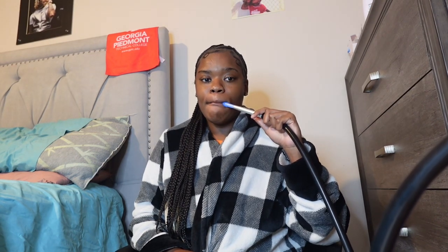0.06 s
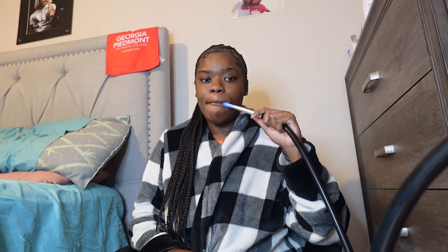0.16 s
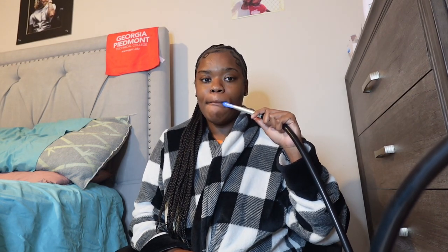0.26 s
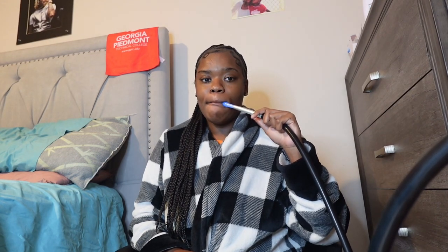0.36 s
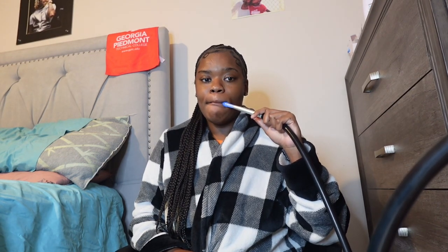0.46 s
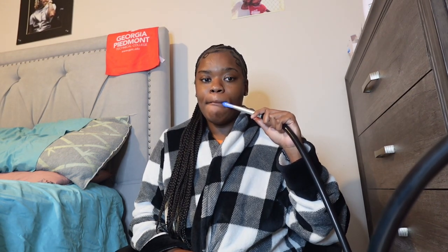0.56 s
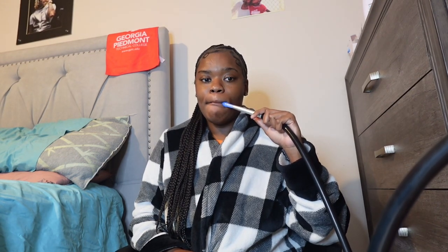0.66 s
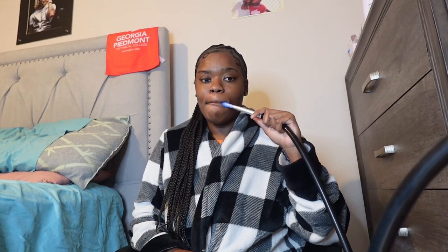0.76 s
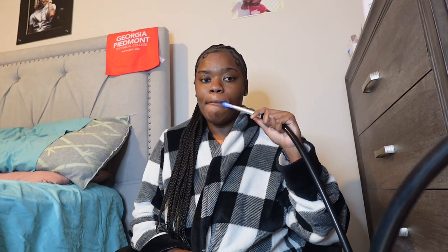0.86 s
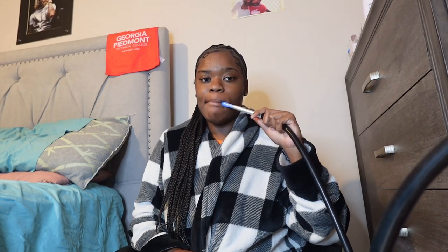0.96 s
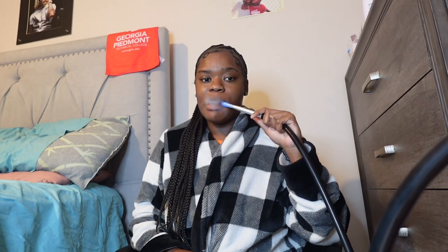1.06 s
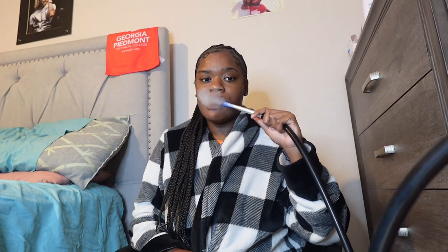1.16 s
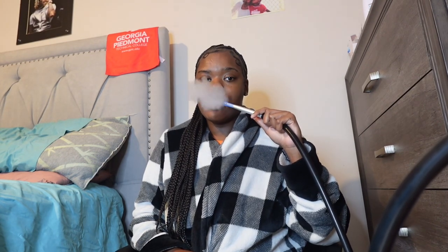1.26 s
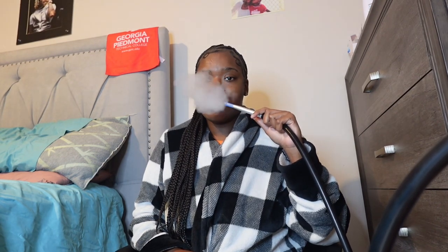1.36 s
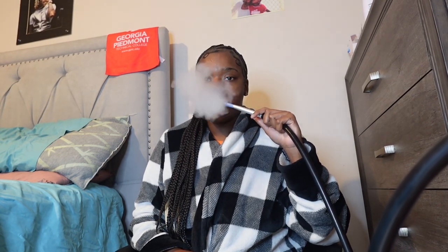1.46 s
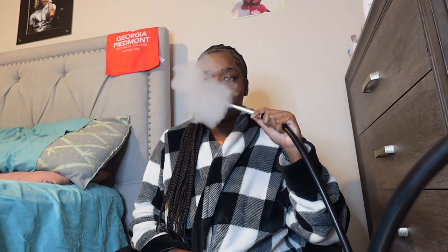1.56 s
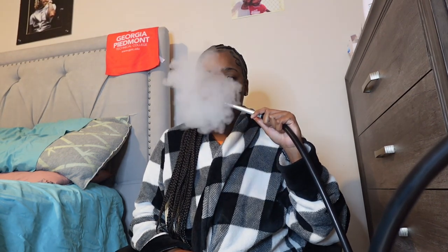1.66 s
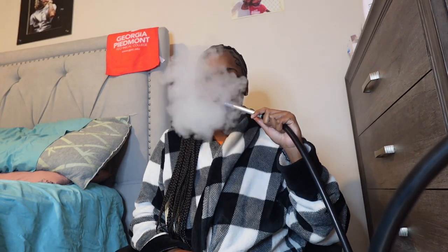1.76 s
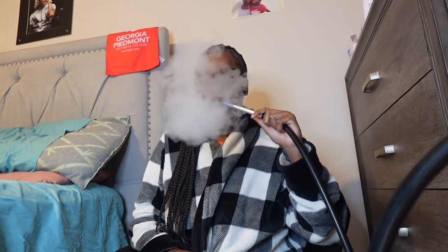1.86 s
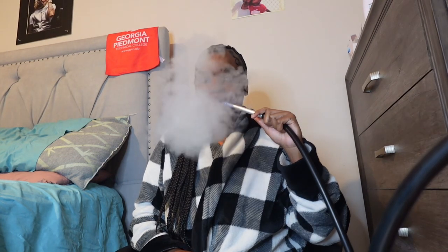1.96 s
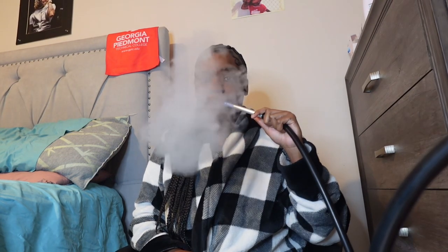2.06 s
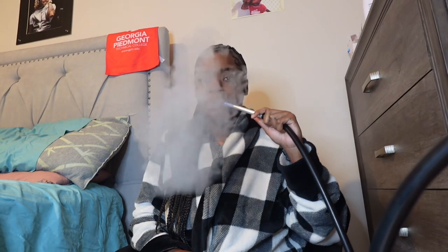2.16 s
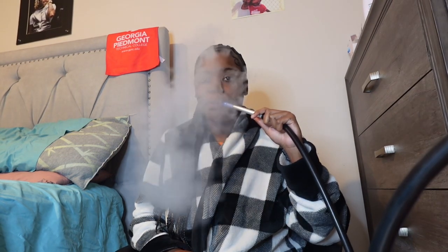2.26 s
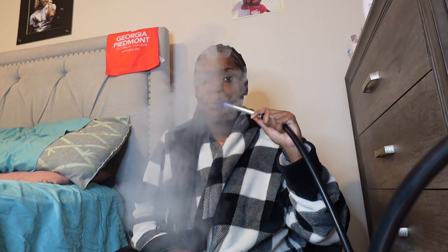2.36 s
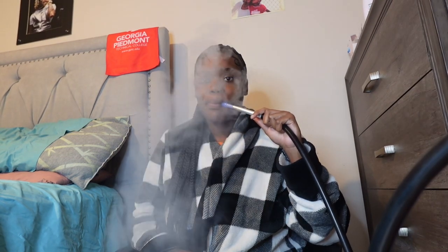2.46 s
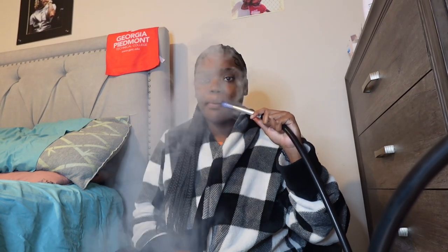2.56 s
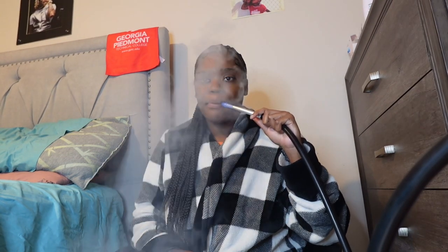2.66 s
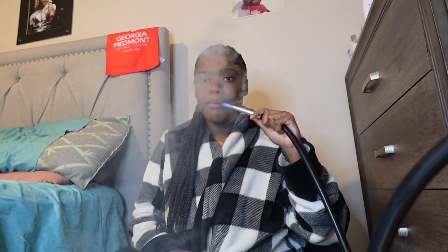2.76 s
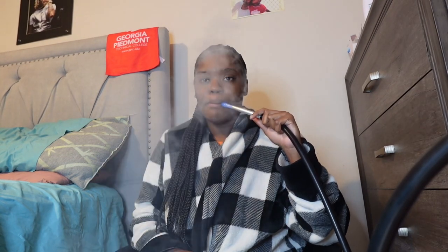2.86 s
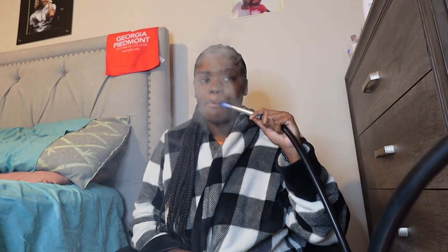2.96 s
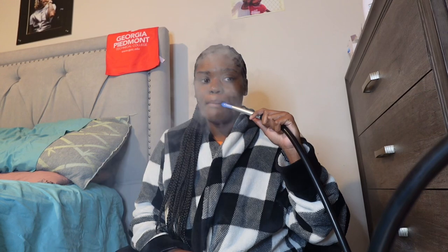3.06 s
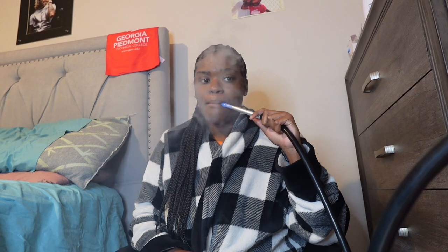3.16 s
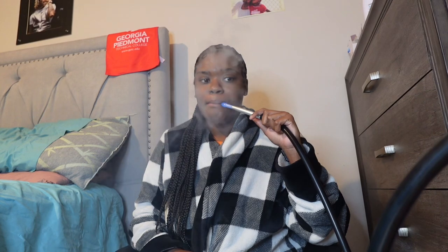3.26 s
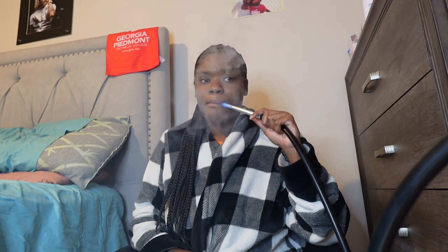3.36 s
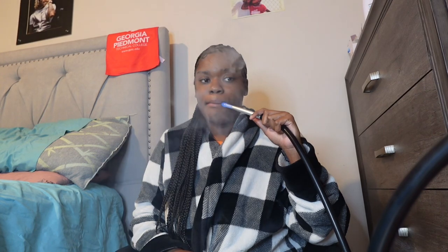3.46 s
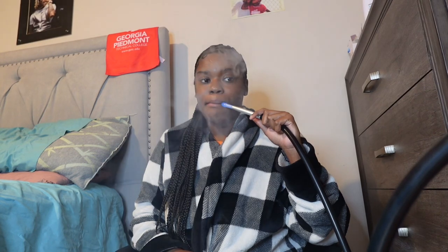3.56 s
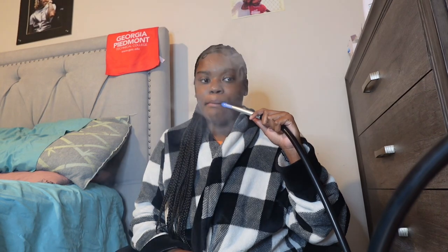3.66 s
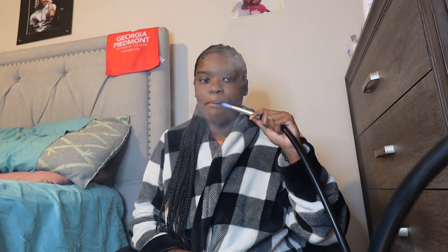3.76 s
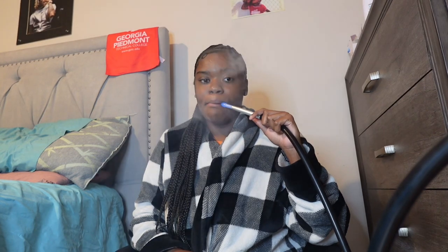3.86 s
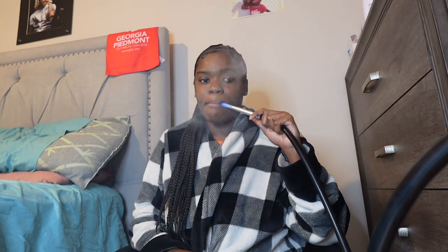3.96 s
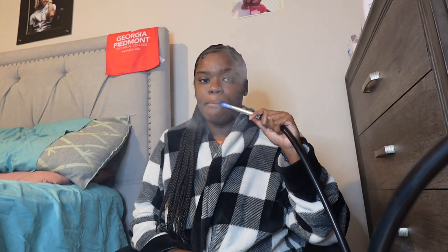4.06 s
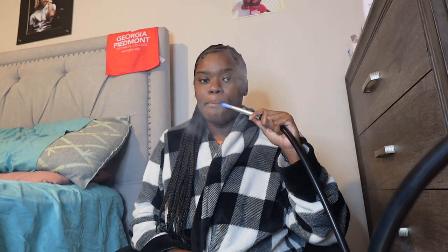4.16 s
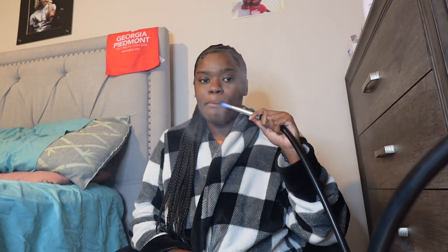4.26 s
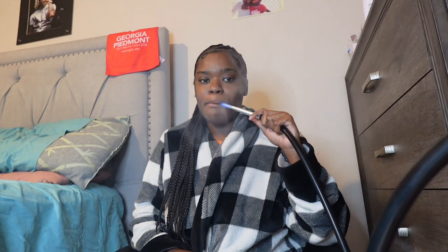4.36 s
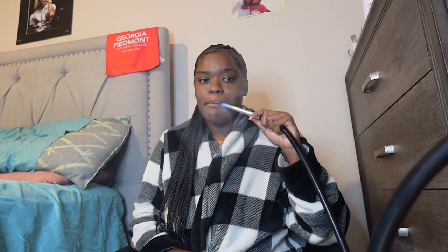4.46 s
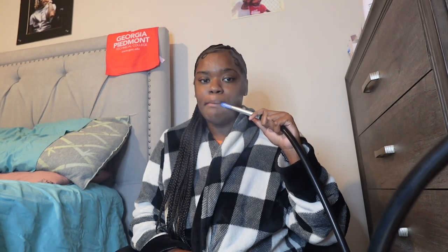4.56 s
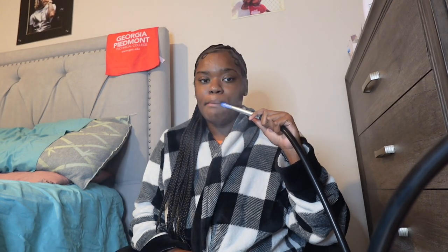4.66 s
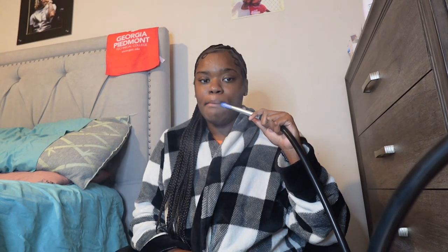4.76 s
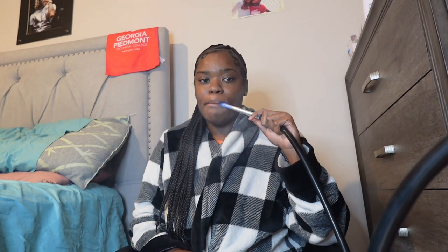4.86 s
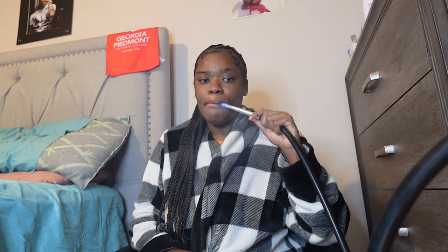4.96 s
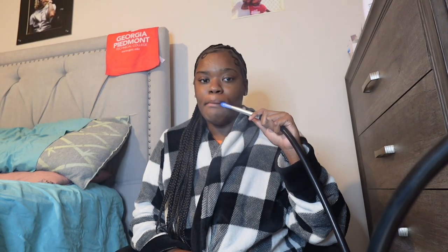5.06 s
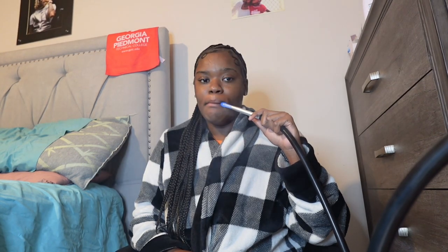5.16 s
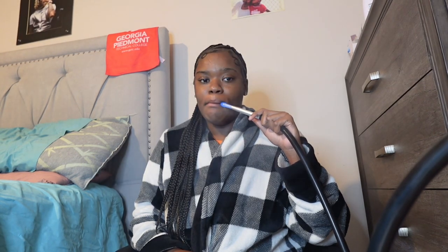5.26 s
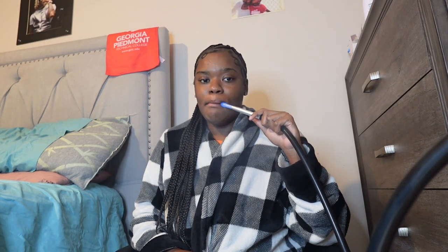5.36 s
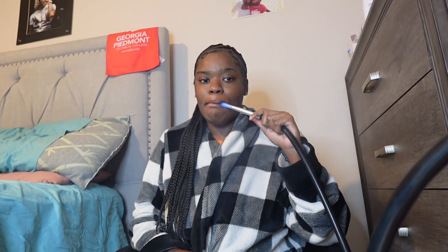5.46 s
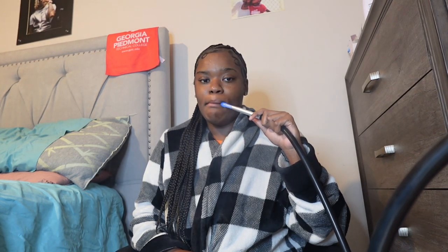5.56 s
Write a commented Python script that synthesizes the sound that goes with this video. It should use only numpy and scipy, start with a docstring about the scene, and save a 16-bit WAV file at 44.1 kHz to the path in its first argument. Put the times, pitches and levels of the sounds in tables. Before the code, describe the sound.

Close stereo capture in a small, still bedroom: gas glugs rapidly through water in a hollow glass base, with snappy pops, fizz and splashing. The first burst is already running and stops early; near silence with a low hum follows. After one tiny click the bubbling returns, dense and throaty, lasting about three seconds, treble leaning right.

```python
"""A water pipe, close and a little right of the microphone, bubbles hard through two long draws.
Gas slugs leave the stem unevenly about 18 times a second; each is a short rising tone that rings the vase.
Spray is gated noise, surface bubbles are snapping and chirping tones, and swarms of small ones fill in.
The place is a small, quiet bedroom: echoes and a short tail, a faint hum, thin whistles and hush.
One light tick comes just before the second draw."""
import sys
import numpy as np
from scipy import signal
from scipy.fft import rfft, irfft, next_fast_len
from scipy.io import wavfile

SR = 44100
rng = np.random.default_rng(int(sys.argv[2]) if len(sys.argv) > 2 else 0)


def inscribe(sig):
    """Save sig as 16-bit PCM at rate SR to the path in sys.argv[1].

    A 1-D sig is mono; a 2-D sig holds one channel per row.
    Samples are clipped to [-1, 1] before scaling.
    """
    pcm = np.round(np.clip(np.atleast_2d(sig).T, -1, 1) * 32767)
    wavfile.write(sys.argv[1], SR, pcm.astype(np.int16))


N = 246644
TIME = np.arange(N) / SR

# still room: pitch_hz, relative density_db (per Hz)
HUSH_CURVE = [(25, -32), (55, -22), (85, -3.5), (190, -5.5), (255, 6.5), (290, 5), (420, 2.5), (690, -2.5),
              (780, -12), (1400, -6), (2500, -10.5), (3200, -17.5), (4200, -17), (5500, -24), (15500, -32)]
# hum of an appliance: pitch_hz, level_db (rms)
HUM_TONES = [(240, -66), (319.5, -54.5)]
# thin whistles in the hush: pitch_hz, level_db (rms)
THIN_WHISTLES = [(3900, -80), (6690, -88)]
# light tick just before the second draw: start_s, relative level_db
LIGHT_TICK = (2.549, -44)
# echoes off the nearest hard surfaces: delay_s, level_db
WALL_ECHOES = [(.0083, -16), (.00893, -20)]
# how much louder the pipe and its echoes are on the right: pitch_hz, level_db
RIGHT_LEAN = [(150, 0), (330, 1.5), (500, 4), (1000, 7.2), (2000, 10.2), (4000, 11.3), (8000, 10.5),
              (13000, 8)]
# how the vase lets the sound of the bubbles out: pitch_hz, gain_db
VASE_OUTLET = [(30, -26), (65, -11), (130, 1), (250, 0.5), (345, 1), (460, -3), (700, 0), (1050, 3.5),
               (1300, -2.5), (1600, 0.5), (3700, 1.5)]
# lowest air modes of the vase above the water: pitch_hz, width_hz, relative level_db
AIR_MODES = [(479, 62, 3), (580, 55, 7.5), (972.6, 63, 6), (1063, 66, 8.5), (1170, 64, -3),
             (1783, 44, -1.5)]
# longest-ringing higher modes of the vase: pitch_hz, width_hz, relative level_db
NECK_MODES = [(1462, 38, -6), (1555, 38, -1), (1672, 34, -2), (1790, 38, 0), (2000, 38, -7), (2155, 34, -9),
              (2342, 40, -8), (2512, 30, -9), (2685, 40, -9), (3390, 70, -7), (3605, 70, 0)]
# spray and froth heard through the vase: pitch_hz, relative density_db (per Hz)
SPRAY_CURVE = [(300, -68), (1500, -10.5), (2500, 8), (3600, -2.5), (4600, 4), (6200, -1), (6750, 3.5),
               (7100, 2), (9300, -1.5), (12700, -16), (13400, -11), (14200, -25)]
# dull sloshing of the whole water body: pitch_hz, relative density_db (per Hz)
SLOSH_CURVE = [(50, 3), (90, -4), (130, -2.5), (180, 0), (350, 11.5), (550, 7.5), (750, 0.5), (1100, 3.5),
               (2500, -41)]
# draws on the hose: start_s, end_s, relative churn_db, relative froth_db
HOSE_DRAWS = [(0, 0.832, -26.5, -48), (2.645, 5.6, -25, -48.5)]
# bubbles heard bursting at the surface, loud and faint: start_s, pitch_hz, relative level_db
SURFACE_POPS = [(.011, 3380, -31.5), (.029, 1780, -29.5), (.092, 1110, -21), (.1617, 2240, -26),
                (.178, 2420, -25.5), (.1826, 1810, -21), (.2043, 1320, -21), (.272, 1010, -22),
                (.286, 1190, -31), (.2955, 955, -32), (.329, 1623, -27), (.555, 1070, -24.5),
                (.6286, 1660, -21), (.6615, 920, -24.5), (.667, 1570, -24.5), (.7937, 1120, -19),
                (2.708, 3090, -35.5), (2.737, 2500, -27), (2.749, 3580, -30), (2.7568, 1220, -22),
                (2.7845, 1410, -25.5), (2.7912, 3680, -24.5), (2.8375, 1036, -20.5), (2.8497, 1086, -19),
                (2.976, 2900, -30), (2.9778, 6770, -35), (3.0005, 6780, -26.5), (3.0008, 1102, -16.5),
                (3.013, 1670, -24), (3.0536, 950, -27.5), (3.1077, 1420, -17.5), (3.1209, 6800, -24),
                (3.1218, 2560, -29), (3.1843, 1070, -18), (3.1848, 4390, -28), (3.193, 1800, -18),
                (3.2455, 967, -20), (3.2755, 1110, -23.5), (3.2774, 3210, -22.5), (3.299, 960, -30),
                (3.3373, 1030, -26), (3.3567, 1302, -16.5), (3.3647, 2150, -22), (3.4238, 6600, -33.5),
                (3.4261, 1700, -19.5), (3.4496, 1580, -25.5), (3.483, 3560, -31), (3.519, 3250, -40),
                (3.5302, 1715, -28), (3.531, 3220, -39), (3.5506, 983, -21.5), (3.6135, 1140, -23),
                (3.6741, 1018, -15.5), (3.7355, 1710, -27), (3.7501, 1070, -22.5), (3.8151, 3660, -24),
                (3.8269, 1800, -16), (3.9077, 2230, -29), (3.9385, 1790, -21), (4.043, 1740, -28),
                (4.3157, 3270, -31.5), (4.3595, 3470, -31.5), (4.3777, 1290, -25), (4.403, 1014, -27),
                (4.4288, 970, -26.5), (4.5215, 1560, -29.5), (4.614, 1680, -24.5), (4.6905, 3060, -26.5),
                (4.7012, 1570, -17), (4.8888, 1040, -21), (4.9951, 1540, -19), (5.1314, 3570, -25),
                (5.165, 1010, -21), (5.248, 2340, -25.5), (5.3265, 2920, -30.5), (5.369, 3360, -28),
                (5.456, 1340, -33), (5.4815, 1080, -28)]
# gas slugs heard leaving the stem, mostly big ones: start_s, pitch_hz, relative level_db
STEM_SLUGS = [(0.1449, 422, -22), (0.2041, 470, -19.5), (0.2273, 452, -25), (0.288, 500, -14.5),
              (0.3229, 486, -21.5), (.377, 495, -20), (0.4, 415, -20), (0.4536, 443, -15),
              (0.5022, 430, -26.5), (0.5217, 498, -18.5), (0.565, 420, -35), (0.5786, 446, -20.5),
              (0.6179, 474, -19.5), (0.6526, 464, -23.5), (0.7107, 463, -14), (0.7857, 478, -18.5),
              (0.7918, 466, -17.5), (0.8316, 429, -17), (0.892, 442, -19), (2.6395, 322, -30),
              (2.6623, 308, -25.5), (2.696, 350, -25), (2.754, 432, -21.5), (2.806, 542, -21.5),
              (2.844, 400, -25.5), (2.9368, 467, -14.5), (2.956, 365, -22.5), (3.0, 446, -14.5),
              (3.0515, 475, -16.5), (3.1235, 455, -18.5), (3.1985, 412, -22.5), (3.2418, 420, -18),
              (3.2667, 477, -18), (3.2913, 446, -18.5), (3.3594, 462, -24.5), (3.3816, 460, -21.5),
              (3.426, 495, -19.5), (3.463, 510, -23), (3.4939, 423, -23.5), (3.549, 550, -26),
              (3.5974, 485, -21.5), (3.6144, 488, -20), (3.6384, 407, -21.5), (3.7043, 400, -23.5),
              (3.734, 523, -21.5), (3.886, 408, -18), (3.9419, 432, -20.5), (3.9935, 455, -13),
              (4.0379, 430, -20.5), (4.0864, 521, -21), (4.167, 421, -19), (4.2076, 470, -15),
              (4.2887, 440, -22), (4.3376, 496, -25), (4.3554, 480, -18.5), (4.4346, 461, -20),
              (4.451, 600, -26.5), (4.4894, 545, -21), (4.5064, 437, -21.5), (4.5523, 408, -18.5),
              (4.6015, 447, -15), (4.6676, 413, -16), (4.719, 457, -18.5), (4.7561, 490, -33),
              (4.7764, 441, -17.5), (4.79, 435, -35), (4.8354, 456, -21), (4.883, 426, -19.5),
              (4.9304, 449, -19.5), (4.9437, 432, -23.5), (5.062, 443, -24), (5.1062, 410, -12),
              (5.1606, 470, -16), (5.217, 450, -20), (5.2769, 453, -25.5), (5.3429, 484, -22),
              (5.382, 445, -23), (5.4376, 450, -19.5), (5.4897, 432, -13.5), (5.5175, 490, -21.5),
              (5.5662, 436, -22.5)]

HUSH_DB, TOP_HZ = -54.5, 15600
CHURN_SAG_DB, FROTH_SAG_DB = 4.5, 7.5  # the suction weakens by this much in the course of a draw
START_S, SETTLE_S = 0.004, 0.055  # the water starts at once and settles quickly
FROTH_RISE_S, FROTH_START_DB, CHURN_START_DB = 0.05, -3, -1.5  # both take a moment to build
SNAP_GROWTH = 0.7  # extra dB of snap for each dB by which a pop is louder than usual
SPLASH_RISE_S = 0.003  # droplets take a moment to fly
DOME_TOP_DB = -18.5  # slugs louder than this break up and make no bigger dome
SLUG_PERIOD_S, SLUG_HZ, SLUG_DB = 0.055, 443, -29.5  # beat of the gas, and an ordinary slug


def undb(db):
    """Decibels to gain."""
    return 10 ** (np.asarray(db) / 20)


def unit(x):
    """Scale to rms 1."""
    return x / np.sqrt(np.mean(x ** 2))


def add(track, s, sound):
    """Mix a sound into a track at s seconds."""
    i = int(np.clip(s * SR, 0, N))
    track[i:i + len(sound)] += sound[:N - i]


def colour(x, points):
    """Filter by a (Hz, dB) curve, without shifting phase."""
    hz, db = np.transpose(points)
    size = next_fast_len(2 * (N // 2 + SR // 8), True)
    f = np.maximum(np.fft.rfftfreq(size, 1 / SR), 1)
    gain = undb(np.interp(np.log(f), np.log(hz), db))
    return irfft(rfft(x, size) * gain, size)[:N]


def noise(points):
    """Coloured noise of rms 1."""
    return unit(colour(rng.standard_normal(N), points))


def convolve(x, response):
    """Pass a track through an impulse response."""
    return signal.fftconvolve(x, response)[:N]


def still_room(side_db=-10, rumble_db=-86):
    """Even hush, a deep rumble that differs left and right, a nearly steady hum and wavering whistles."""
    rumble = noise([(25, 4), (50, -8), (300, -45)])
    hush = undb(HUSH_DB) * noise(HUSH_CURVE)
    side = undb(HUSH_DB + side_db) * noise(HUSH_CURVE) + undb(rumble_db) * rumble
    slow = [(1, 0), (3, -3), (12, -40), (200, -120)]
    hum, whistles = np.zeros(N), np.zeros(N)
    for hz, db in HUM_TONES:
        phase = 2 * np.pi * hz * TIME + 0.15 * noise(slow)
        hum += undb(db) * np.sqrt(2) * np.sin(phase)
    for hz, db in THIN_WHISTLES:
        narrow = noise([(hz * 0.92, -60), (hz, 0), (hz / 0.92, -60)])
        whistles += undb(db) * noise(slow) * narrow
    return hush + side * np.array([[1], [-1]]) + hum + whistles


def tick(fall_s=0.0028):
    """One faint, bright tick: coloured noise that starts abruptly and dies away."""
    s, db = LIGHT_TICK
    tone = [(700, -31), (2000, 10.0), (3500, -2), (14000, -18)]
    return undb(db) * noise(tone) * (TIME > s) * np.exp(-np.abs(TIME - s) / fall_s)


def slap(x):
    """Distinct echoes off the nearest hard surfaces."""
    out = np.zeros(N)
    for s, db in WALL_ECHOES:
        add(out, s, undb(db) * x)
    return out


def bedroom(x, early_db=-11, early_s=0.01, tail_db=-13, t60=0.67):
    """Scattered echoes off the furniture, then a short tail soaked up by the bedding."""
    t = TIME[:SR // 2]
    early, tail = rng.standard_normal((2, len(t)))
    sparse = rng.random(len(t)) < 0.03
    early = unit(early * sparse * (t > 0.002) * np.exp(-t / early_s))
    tail = unit(tail * (t > 0.008) * np.exp(-np.log(1000) * t / t60))
    response = undb(early_db) * early + undb(tail_db) * tail
    return convolve(x, response / np.sqrt(len(t)))


def ring(modes, wave=np.sin):
    """Response of a set of (Hz, width Hz, dB) modes to a sudden push."""
    t = TIME[:SR // 12]
    return sum(undb(db) * np.exp(-np.pi * width * t) * wave(2 * np.pi * hz * t)
               for hz, width, db in modes)


def upper_modes(x, count=100, low_hz=1350, high_hz=5200, crowd_db=-19, neck_db=-19, width_hz=70):
    """Sound lingers between the glass walls: a few strong modes in a crowd of weak ones."""
    place, damping, strength = rng.standard_normal((count, 3)).T
    hz = low_hz * (high_hz / low_hz) ** ((np.arange(count) + place / 2) / count)
    width = width_hz * np.sqrt(hz / low_hz) * np.exp(0.2 * damping)
    modes = list(zip(hz, width, strength + 10 * np.log10(hz / low_hz)))
    # neighbouring modes push the air in opposite senses
    crowd = unit(ring(modes[::2]) - ring(modes[1::2]))
    neck = unit(ring(NECK_MODES, np.cos))
    response = undb(crowd_db) * crowd + undb(neck_db) * neck
    return convolve(x, response / np.sqrt(len(response)))


def drawing():
    """Gains of churn and froth: each draw whips the water up, weakens steadily and settles at its end."""
    churn, froth = np.zeros(N), np.zeros(N)
    for start, end, churn_db, froth_db in HOSE_DRAWS:
        before, after = np.maximum(start - TIME, 0), np.maximum(TIME - end, 0)
        gate = np.exp(-before / START_S - after / SETTLE_S)
        age = np.clip(TIME - start, 0, end - start)
        spent, calm = age / (end - start), np.exp(-age / FROTH_RISE_S)
        churn += gate * undb(churn_db - CHURN_SAG_DB * spent + CHURN_START_DB * calm)
        froth += gate * undb(froth_db - FROTH_SAG_DB * spent + FROTH_START_DB * calm)
    return churn, froth


def slack(s):
    """Share of the current draw that has passed at s seconds, 0-1."""
    begun = [draw for draw in HOSE_DRAWS if draw is HOSE_DRAWS[0] or draw[0] - 0.05 < s]
    start, end = begun[-1][:2]
    return np.clip((s - start) / (end - start), 0, 1)


def aftermath(events, rise_s, fall_s):
    """Agitation that each burst leaves behind, as a gain; bursts add by power."""
    bursts, t = np.zeros(N), TIME[:SR // 6]
    for s, hz, db in events:
        add(bursts, s, undb([db]) ** 2)
    shape = (1 - np.exp(-t / rise_s)) * np.exp(-t / fall_s)
    return np.sqrt(np.abs(convolve(bursts, shape ** 2)))


def spray(events, froth, splash_db=-23, froth_db=-4, grain_db=5.0, lead_s=0.0026, scatter_db=2,
          follow=0.18):
    """Droplets spatter around each burst, the more so on a thick froth, over its steady fizz."""
    chance = rng.standard_normal(len(events))
    splashes = [(s - lead_s, hz, db + scatter_db * c) for (s, hz, db), c in zip(events, chance)]
    splash = aftermath(splashes, rise_s=SPLASH_RISE_S, fall_s=0.02)
    thickness = np.maximum(froth / froth.max(), 0.4) ** follow
    # every half millisecond brings droplets of another size
    sizes = np.repeat(np.minimum(rng.standard_normal(N // 24 + 1), 2), 24)[:N]
    grains = undb(grain_db * sizes) * rng.standard_normal(N)
    gain = np.hypot(splash * thickness * undb(splash_db), froth * undb(froth_db))
    return gain * unit(colour(grains, SPRAY_CURVE))


def bubble(hz, cycles, swell, glide):
    """A pocket of gas rings: it swells and dies within a few cycles while its pitch slides up."""
    turns = np.arange(int(7 * cycles * SR / hz)) * hz / SR
    envelope = (1 - np.exp(-(turns / swell) ** 2)) * np.exp(-turns / cycles)
    bend = 1 + glide * np.tanh((turns / cycles - 1 / 2) / 2)
    return envelope / envelope.max() * np.sin(2 * np.pi * np.cumsum(bend) * hz / SR)


def swarm(gain, count, low_hz, high_hz, cycles, spread_db):
    """Many lesser bubbles of all sizes, as strong as the flow that makes them; most barely rise in pitch."""
    out = np.zeros(N)
    for when, size, strength, side, rise in rng.random((count, 5)):
        hz = low_hz * (high_hz / low_hz) ** size
        blip = bubble(hz, cycles, swell=1, glide=0.12 * rise ** 2)
        polarity = np.sign(side - 0.5)
        add(out, when * N / SR, polarity * undb(spread_db * strength ** 3) * blip)
    return unit(out) * gain


def domes_and_strays(slugs, dome_hz=1020, dome_db=-9.0, dome_sag_db=4, dome_spread=0.153, lag_s=0.0055,
                     spread_db=-3.0, stray_db=-4, low_hz=1400, high_hz=2800, small_db=-3, count=30):
    """During a draw each slug soon bursts as a surface dome; strays burst any time, the smaller the fainter."""
    rows = []
    for (s, _, db), (late, size, strength) in zip(slugs, rng.standard_normal((len(slugs), 3))):
        if any(start < s < end for start, end, _, _ in HOSE_DRAWS):
            level = min(db, DOME_TOP_DB) + dome_db - dome_sag_db * slack(s) + spread_db * strength
            rows.append((s + lag_s * abs(late), dome_hz * np.exp(dome_spread * size), level))
    churn_db = 20 * np.log10(drawing()[0] + 1e-9)
    for when, size in rng.random((count, 2)):
        level = churn_db[int(when * N)] + stray_db + small_db * size
        rows.append((when * N / SR, low_hz * (high_hz / low_hz) ** size, level))
    return rows


def pops(bursts, pop_db=3.0, snap_db=-7, lead_s=0.0003, rings=2.7, snap_hz=2400, vase_db=-18,
         usual_db=-21, puff_db=-9, linger_db=-12):
    """A film snaps, puffs dully and jolts the vase air; the opened cavity rings, and small ones chirp on."""
    out = np.zeros(N)
    for (s, hz, db), chance in zip(bursts, rng.standard_normal((len(bursts), 2))):
        cycles = rings * np.sqrt(hz / 1500) * np.exp(0.16 * chance[0])
        small = hz / 1600  # 1 for a middling bubble, which snaps hardest
        cavity = bubble(hz, cycles, swell=0.52 * max(small, 1), glide=0.04)
        add(out, s - lead_s, undb(db + pop_db) * cavity)
        chirp = bubble(hz, 3 * cycles, swell=2 * cycles, glide=0.06 * abs(chance[1]))
        add(out, s, undb(db + linger_db) * min(small, 1) * chirp)
        snap = bubble(snap_hz * np.exp(0.12 * chance[1]), cycles=0.5, swell=0.35, glide=0)
        snap_level = db + snap_db + SNAP_GROWTH * (db - usual_db)
        add(out, s, undb(snap_level) * min(small, 1 / small ** 2) * snap)
        puff = bubble(750, cycles=0.5, swell=0.35, glide=0)
        add(out, s - lead_s, undb(db + puff_db) * min(small, 1 / small) ** 2 * puff)
        add(out, s, undb(db + vase_db) * min(1 / small, 1) * ring(AIR_MODES))
    return out


def ordinary_slugs(jitter_s=0.00502, pitch_spread=0.068, spread_db=2):
    """Ordinary slugs keep the beat wherever the listed ones leave a gap, as (s, Hz, dB)."""
    rows, chance = [], iter(rng.standard_normal((200, 3)))
    for start, end, _, _ in HOSE_DRAWS:
        marks = [start] + [s for s, _, _ in STEM_SLUGS if start < s < end] + [end]
        for before, after in zip(marks, marks[1:]):
            beats = max(round((after - before) / SLUG_PERIOD_S), 1)
            for s in np.linspace(before, after, beats + 1)[1:-1]:
                late, size, strength = next(chance)
                db = SLUG_DB + spread_db * strength
                rows.append((s + jitter_s * late, SLUG_HZ * np.exp(pitch_spread * size), db))
    return rows


def glugs(slugs, glug_db=0, vase_db=-14.5, vase_sag_db=5, lead_s=0.0012, rings=1.35, linger_db=-12,
          trail_db=-11, trail_s=0.013, ahead_db=-12, ahead_s=0.00705):
    """Each slug plops off the stem, rings on rising and jolts the vase air; smaller ones lead and trail."""
    out = np.zeros(N)
    for (s, hz, db), chance in zip(slugs, rng.standard_normal((len(slugs), 7))):
        cycles = rings * max(420 / hz, 1) ** 2.3 * np.exp(0.067 * chance[0])
        add(out, s - lead_s, undb(db + glug_db) * bubble(hz, cycles, swell=1.07, glide=0.17))
        lingering = bubble(hz * 0.96, cycles=4, swell=4, glide=0.1)
        add(out, s - lead_s, undb(db + linger_db) * lingering)
        # the heaving water changes the air space, so every jolt is tuned a little differently
        heave = np.exp(0.035 * chance[2])
        jolt = ring([(mode_hz * heave, width, mode_db) for mode_hz, width, mode_db in AIR_MODES])
        push = 1 - np.exp(-TIME[:len(jolt)] / 0.0015)
        sharpness = min(hz / 420, 1) ** 3  # big, slow slugs barely jolt it
        jolt_db = db + vase_db - vase_sag_db * slack(s) + chance[1]
        add(out, s, undb(jolt_db) * sharpness * push * jolt)
        trail_hz, ahead_hz = hz * np.exp(0.12 * chance[[3, 5]])
        trailer = bubble(trail_hz, rings, swell=0.53, glide=0.082)
        add(out, s + trail_s * np.exp(0.4 * chance[4]), undb(db + trail_db) * trailer)
        leader = bubble(ahead_hz, rings, swell=0.58, glide=0.14)
        add(out, s - ahead_s * np.exp(0.431 * chance[6]), undb(db + ahead_db) * leader)
    return out


def water(slugs, bursts, flow, froth, gurgle_db=-12, plink_db=-15.0, fizz_db=-1, crackle_db=-4,
          slosh_db=-12, wake_db=-13, steady_db=-4.5):
    """Everything that stirs in the vase; the water churns hardest in the wake of each slug."""
    wake = aftermath(slugs, rise_s=0.002, fall_s=0.0063)
    churn = np.hypot(flow * undb(steady_db), wake * undb(wake_db))
    gurgle = swarm(churn * undb(gurgle_db), 200, low_hz=340, high_hz=590, cycles=3, spread_db=12)
    plinks = swarm(churn * undb(plink_db), 340, low_hz=850, high_hz=2300, cycles=4.6, spread_db=12)
    # a burst film breaks into tiny bubbles that fizz and crackle away
    shreds = np.hypot(froth, undb(-16) * aftermath(bursts, rise_s=0.002, fall_s=0.012))
    fizz = swarm(shreds * undb(fizz_db), 1700, low_hz=1550, high_hz=4100, cycles=7.5, spread_db=15)
    crackle = swarm(shreds * undb(crackle_db), 2600, low_hz=1800, high_hz=5600, cycles=1.4, spread_db=14)
    slosh = churn * undb(slosh_db) * noise(SLOSH_CURVE)
    stirring = glugs(slugs) + pops(bursts) + gurgle + plinks + fizz + crackle + slosh
    return colour(stirring, VASE_OUTLET)


def scene(apart_db=-4):
    """The pipe stands to the right, the more clearly so in the treble; its echoes spread a little."""
    slugs = list(STEM_SLUGS) + ordinary_slugs()
    bursts = list(SURFACE_POPS) + domes_and_strays(slugs)
    churn, froth = drawing()
    pipe = water(slugs, bursts, churn, froth) + spray(slugs + bursts, froth) + tick()
    pipe = pipe + upper_modes(pipe)
    near = pipe + slap(pipe) + bedroom(pipe)
    spread = undb(apart_db) * bedroom(pipe)
    # left and right gains add up to 2 at every pitch
    left_share = [(hz, 20 * np.log10(2 / (1 + undb(db)))) for hz, db in RIGHT_LEAN]
    left = colour(near, left_share) + spread / 2
    return np.array([left, 2 * near - left]) + still_room()


def record(dry):
    """The recorder cuts the top with a steep low-pass."""
    return signal.sosfilt(signal.ellip(10, 0.1, 80, TOP_HZ, fs=SR, output="sos"), dry)


dry = scene()
out = record(dry)
inscribe(out)
```